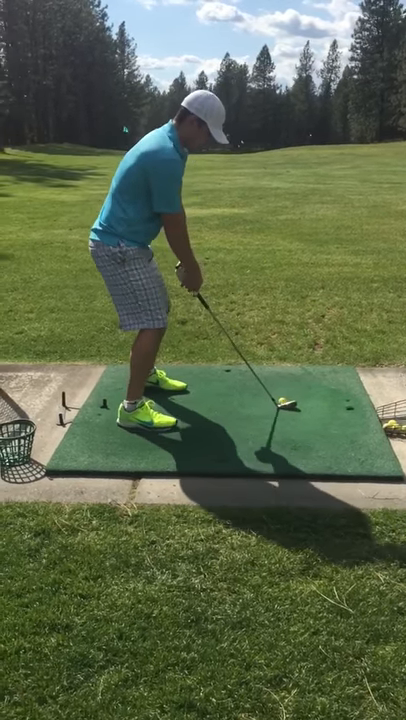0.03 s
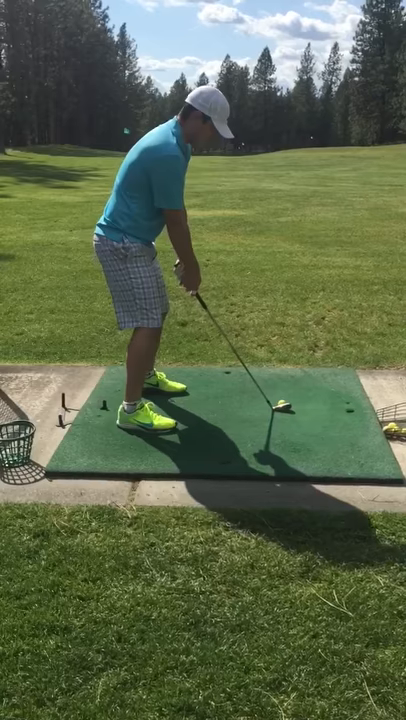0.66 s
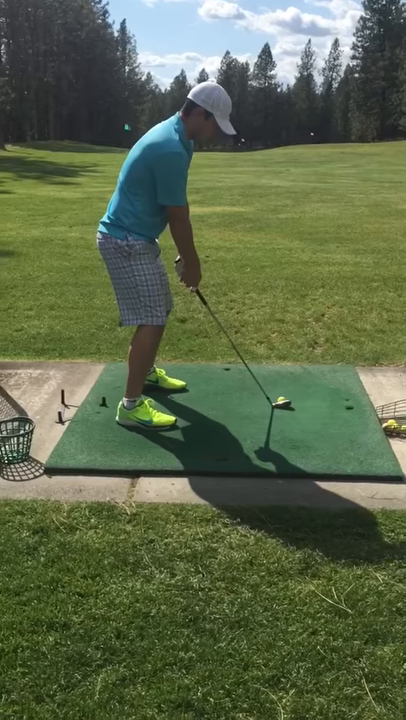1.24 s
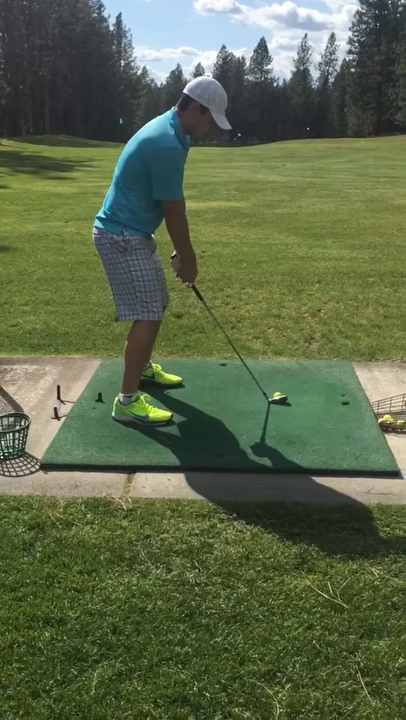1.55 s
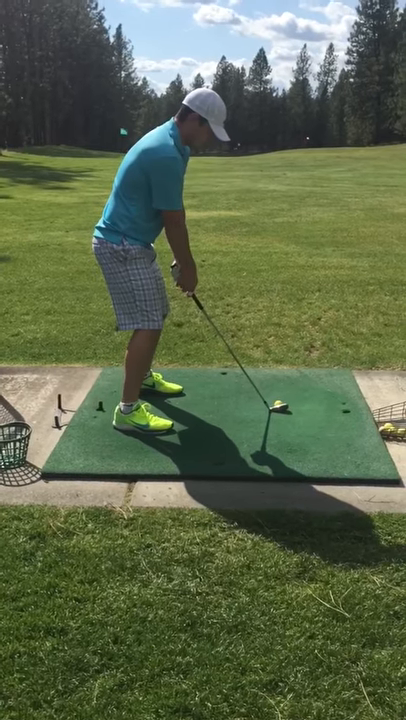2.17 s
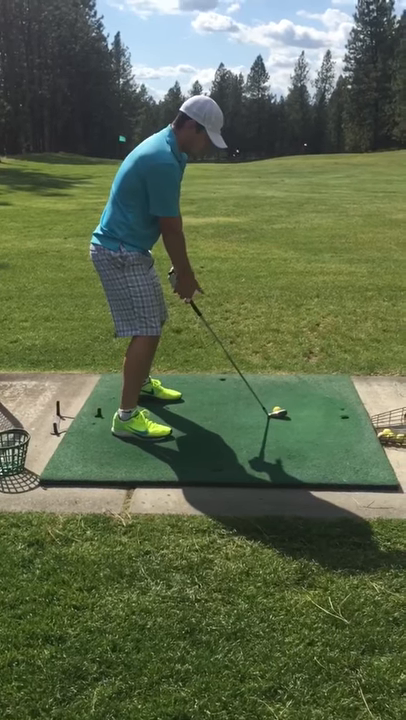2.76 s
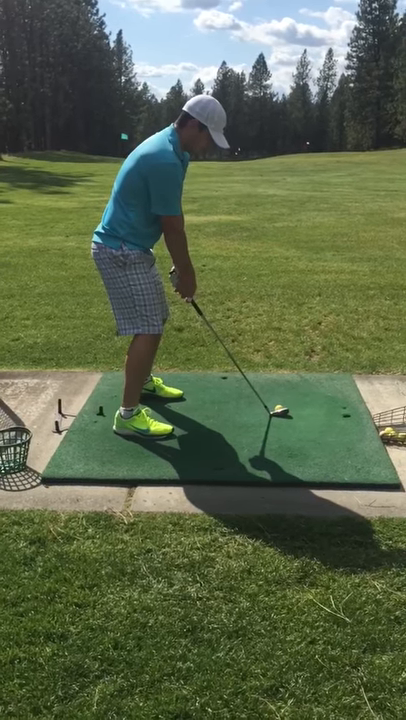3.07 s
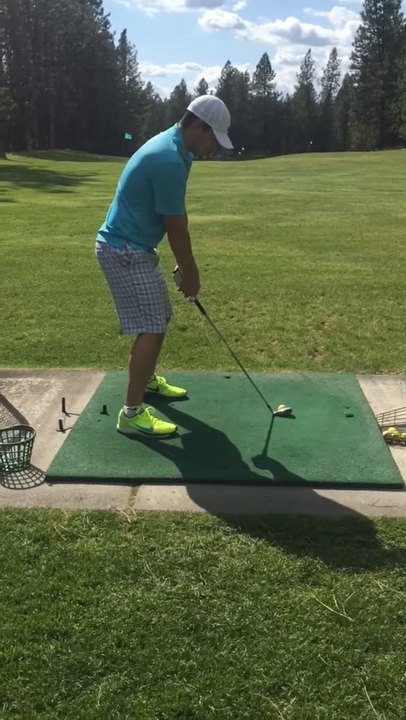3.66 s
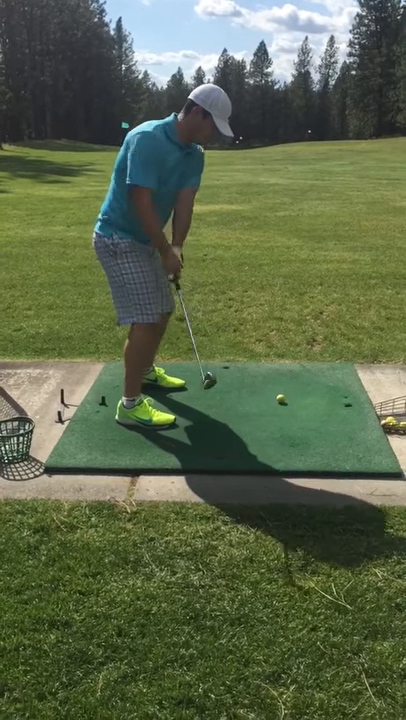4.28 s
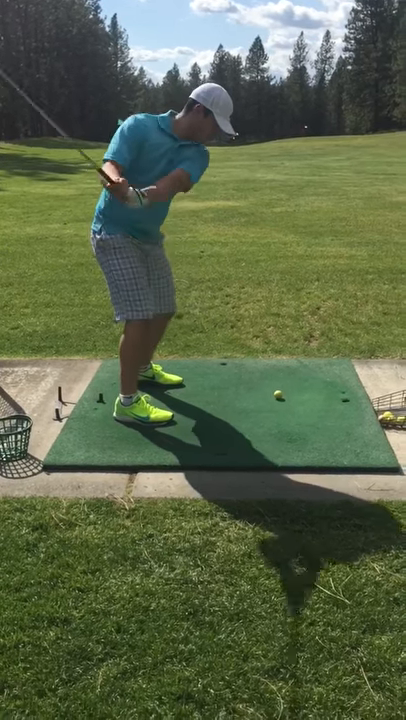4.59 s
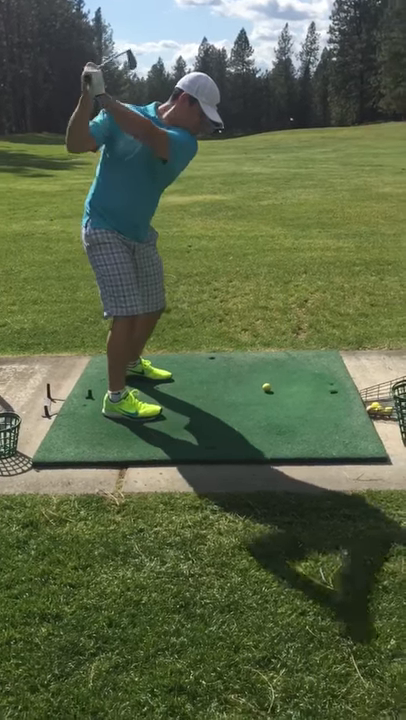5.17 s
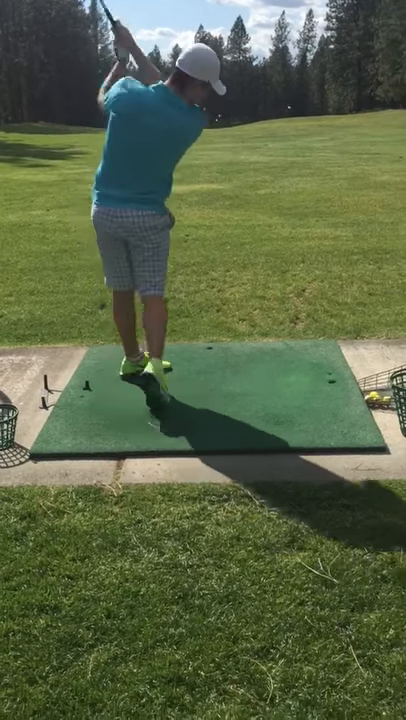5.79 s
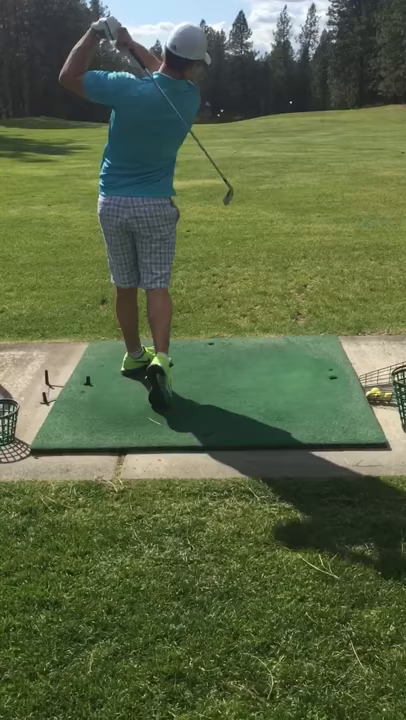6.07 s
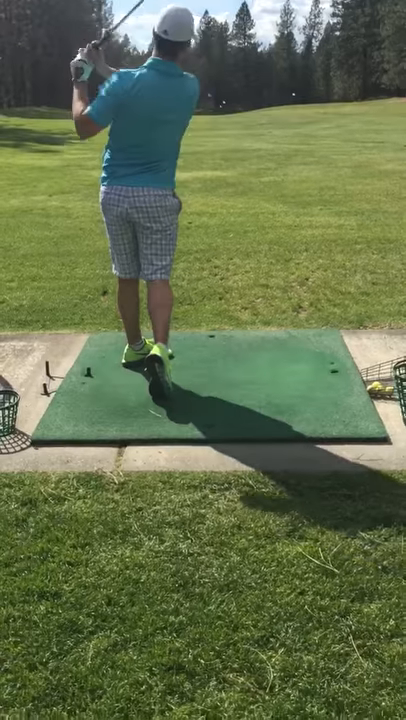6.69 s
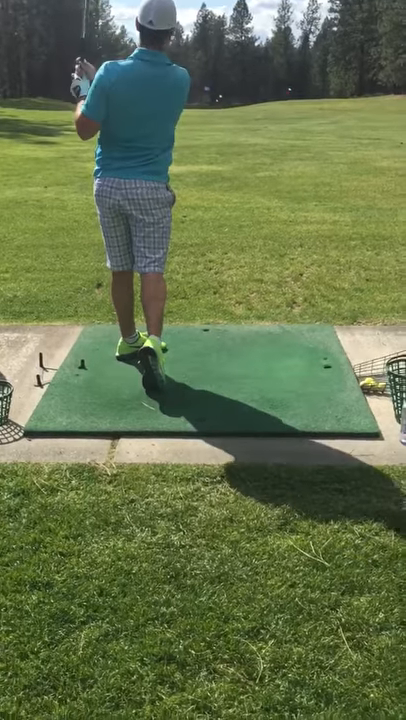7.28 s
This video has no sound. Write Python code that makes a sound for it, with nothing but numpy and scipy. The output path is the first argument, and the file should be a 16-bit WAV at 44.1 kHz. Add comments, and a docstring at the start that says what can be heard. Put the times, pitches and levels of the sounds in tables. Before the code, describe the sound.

A single golf shot cracks out close by, late in a quiet stretch of far traffic hum and tiny, faint bird chirps. The hit is hard and bright, with a quick slight echo and the soft hiss of the ball flying off. Right afterwards wind rumbles and thumps on the microphone, strongest at first, then returning in a weaker gust across the open range.

```python
"""Iron shot at a driving range

A golfer hits one ball off a mat, a few metres from a phone. Club head and ball ring with a hard crack
that bounces off the pad and echoes once; the spinning ball hisses away and a shoe scuffs as it pivots.
Gusts buffet the microphone, hardest just after the shot. Behind it all: the rumble and tyre roar of
far traffic, droning engines and small birds chipping in the pines."""
import sys
import numpy as np
from scipy import signal
from scipy.fft import rfft, irfft
from scipy.io import wavfile
from scipy.ndimage import uniform_filter1d

SR = 44100
rng = np.random.default_rng(int(sys.argv[2]) if len(sys.argv) > 2 else 0)


def wrap_up_sound(samples):
    """Save the sound to the file named by the first command line argument, as 16-bit audio."""
    columns = np.atleast_2d(samples).T
    # keep every value between -1 and 1, then stretch to whole-number steps
    tamed = np.clip(columns, -1, 1)
    steps = np.round(tamed * 32767).astype(np.int16)
    wavfile.write(sys.argv[1], SR, steps)


N = 328104
TIME = np.arange(N) / SR
STRIKE_S = 5.70105

# far engine tones: (pitch [Hz], relative level [dB], holds until [s])
ENGINE_TONES = [(62.4, -51, 0.89), (78.5, -45.5, 3.0), (123.3, -49.5, 1.9), (155.9, -50, 1.97),
                (224, -61.5, 5.1), (282, -62, 4.6)]
# rising bird chips: (time [s], start pitch [Hz], end pitch [Hz], level [dB])
BIRD_CHIPS = [(1.325, 6100, 6500, -72), (1.345, 6450, 7350, -73), (1.372, 6100, 6450, -71),
              (1.378, 6950, 7350, -76), (3.097, 6050, 6450, -75), (3.322, 6050, 6400, -75),
              (4.7, 6150, 6450, -77), (4.728, 5750, 6440, -72), (4.745, 7000, 7250, -74),
              (6.35, 7050, 7500, -72), (6.36, 6150, 6900, -72), (6.383, 6950, 7340, -66),
              (6.4, 6200, 6650, -71)]
# gust envelopes: (rise ends [s], sag starts [s], fall starts [s], nominal level [dB])
GUST_ENVELOPES = [(4.808, 4.98, 4.6, -49), (5.651, 5.665, 6.3, -39.5), (5.905, 5.95, 5.965, -31.5),
                  (6.08, 6.26, 6.32, -20.5), (6.388, 6.514, 6.55, -27.5), (6.65, 6.751, 6, -44.5),
                  (6.905, 7.262, 7.23, -38.5)]
# large eddies that thump: (time [s], thump level [dB], pitch [Hz], puff level [dB])
EDDY_THUMPS = [(4.826, -33.5, 68, -70), (4.991, -28.5, 71.5, -70.5), (5.502, -28, 68.6, -70),
               (5.653, -22, 100, -50), (5.82, -22, 88, -52), (5.945, -15, 104.3, -46),
               (6.022, -25.5, 300, -34), (6.048, -16, 84.9, -29), (6.07, -6.5, 220.4, -17.5),
               (6.085, -13, 220, -26.5), (6.116, -13.5, 139.4, -30.5), (6.129, -14, 160, -37.5),
               (6.138, -11.5, 161, -23), (6.156, -10, 240, -16.5), (6.171, -9.5, 174.4, -27),
               (6.191, -11.5, 135, -47), (6.211, -9, 149, -29.5), (6.232, -16, 170, -27),
               (6.255, -9, 167, -25), (6.268, -10, 197.5, -23), (6.282, -10.5, 130, -39),
               (6.313, -15, 180, -24), (6.348, -10.5, 159.6, -27.5), (6.376, -12, 180, -27),
               (6.41, -21, 170, -38), (6.427, -18.5, 190, -39), (6.47, -18.5, 220, -38.5),
               (6.507, -11.5, 140.5, -43.5), (6.521, -17, 109, -36.5), (6.549, -22.5, 94, -47),
               (6.566, -26, 170, -48.5), (6.903, -25, 177, -60), (6.915, -19.5, 101, -57),
               (7.041, -19.5, 152, -52), (7.059, -16.5, 147.2, -51), (7.155, -15.5, 94.8, -45),
               (7.194, -18.5, 138, -58), (7.21, -20, 85.2, -53), (7.268, -24.5, 220, -49),
               (7.278, -18.5, 69.8, -53), (7.376, -26, 109.8, -56)]
# rubber sole slipping on the mat: (time [s], level [dB])
SHOE_SLIPS = [(6.015, -49), (6.028, -50.5)]
# resonances that colour the echo: (centre [Hz], width [Hz], relative level [dB])
ECHO_BANDS = [(1580, 240, -13.5), (3034, 400, -18), (3850, 310, -16.5)]
# ring of club head and ball: (pitch [Hz], level [dB], 60 dB decay time [s])
IMPACT_MODES = [(170, -9.1, .0093), (587, -21, .024), (859, -16.5, .03), (918, -12.8, .033),
                (1104, -6.6, .018), (1337, -6.2, .0088), (1621, -7.3, .0118), (2035, -2.6, .0139),
                (2349, -11.5, .027), (2483, -18.5, .02), (3569, -9.9, .0182), (3966, -27.2, .036),
                (4472, -6.3, .0037), (4918, -24.6, .014), (5774, -34.9, .03), (6065, -20.1, .0077),
                (6532, -12.4, .0055), (8352, -18.5, .0039)]

# noise colours of far traffic, shoe scuff and flying ball: (frequency [Hz], relative level [dB])
TRAFFIC_COLOUR = [(15, -53.5), (25, -30), (40, -10.5), (59, 3), (100, -3), (160, -4.5), (277, -13),
                  (463, -28), (750, -21.5), (1150, -20.5), (1500, -24.5), (2000, -31), (2900, -46),
                  (4300, -51), (4900, -55.5), (5600, -53), (7600, -58), (9300, -57), (10400, -62),
                  (11400, -59.5), (14000, -61), (14700, -65), (16000, -61.5)]
SHOE_COLOUR = [(1500, -18), (3400, 6), (4600, -3.5), (6500, 4.5), (9500, -3), (12000, 1.5), (16000, -6.5)]
BALL_COLOUR = [(500, -28.5), (1400, -2), (2400, 1.5), (4000, -4.5), (6000, -12), (9000, -18), (12000, -22),
               (16000, -21.5)]
# noise colours of the wind's rumble, tearing and puffs: (frequency [Hz], relative level [dB])
WIND_COLOUR = [(20, -13), (45, 2.5), (90, 2), (150, -2), (230, -7.5), (330, -21.5), (600, -41.5),
               (2000, -90.5)]
TEAR_COLOUR = [(120, -13), (260, 0), (400, 0), (750, -17), (1200, -33), (2500, -58), (10000, -100)]
PUFF_COLOUR = [(120, -13), (260, 0), (450, 1), (750, -8), (1200, -23), (2500, -52), (10000, -100)]
# noise colours of swing, echo smear, mat brush and scattered tail: (frequency [Hz], relative level [dB])
SWING_COLOUR = [(300, -12), (900, 2), (2200, -1.5), (3200, -9.5), (5000, -16), (8000, -22), (16000, -28)]
SMEAR_COLOUR = [(600, -27), (1500, 2.5), (2800, .5), (4200, -14), (6000, -23), (16000, -41)]
MAT_COLOUR = [(150, -2.5), (900, 0), (2600, -4), (3600, -9.5), (5500, -14), (9000, -17), (16000, -23)]
TAIL_COLOUR = [(200, 2), (1000, -.5), (2000, -3.5), (3000, -13.5), (3900, -7.5), (4900, -21.5),
               (7000, -19), (16000, -27)]


def undb(db):
    """Decibels to gain."""
    return 10 ** (np.asarray(db) / 20)


def unit(x):
    """Scale to rms 1."""
    return x / np.std(x)


def noise(colour):
    """Noise of rms 1, shaped by a colour table."""
    hz, db = np.transpose(colour)
    bins = np.fft.rfftfreq(N, 1 / SR)
    eq = undb(np.interp(np.log(bins + 1), np.log(hz), db))
    return unit(irfft(rfft(rng.standard_normal(N)) * eq, N))


def filt(x, hz, kind, order=2):
    """Butterworth filter."""
    return signal.sosfilt(signal.butter(order, hz, kind, fs=SR, output="sos"), x)


def drift(rate_hz):
    """Smooth random modulation with spread 1."""
    knots = rng.standard_normal(int(N / SR * rate_hz) + 2)
    ramps = np.interp(TIME * rate_hz, np.arange(len(knots)), knots)
    return unit(uniform_filter1d(ramps, int(SR / rate_hz / 2)))


def delay(x, lag_s):
    """The same sound, arriving later."""
    return np.interp(TIME - lag_s, TIME, x, left=0)


def since(start):
    """Seconds gone by after a moment, zero before it."""
    return np.maximum(TIME - start, 0)


def until(end):
    """Seconds left before a moment, zero after it."""
    return np.maximum(end - TIME, 0)


def decay(start, t60):
    """Instant attack, then a fall of 60 dB every t60 seconds."""
    return (TIME >= start) * np.exp(-np.log(1000) * since(start) / t60)


def traffic(rumble_db=-44.5, recede_db_per_s=.62, roar_db=-49.5, shimmer_db=2):
    """Far traffic: a slowly receding rumble under tyre roar that shimmers on the breeze."""
    bed = noise(TRAFFIC_COLOUR)
    rumble = unit(filt(bed, 435, "low", order=4)) * undb(rumble_db - recede_db_per_s * TIME + drift(12))
    roar = filt(bed, 426, "high", order=4)
    # moving air lets each band swell and sink on its own
    for hz in np.geomspace(800, 2800, 16):
        band = signal.lfilter(*signal.iirpeak(hz, Q=16, fs=SR), roar)
        roar = roar + band * (undb(shimmer_db * drift(18)) - 1)
    return rumble + unit(roar) * undb(roar_db)


def engines(trim_db=-1.5, drop_db=11.5, release_s=.58, waver=.008):
    """Far engines drone in wavering tones; each holds, then sinks to a lower level."""
    out = 0
    for hz, db, holds in ENGINE_TONES:
        phase = 2 * np.pi * np.cumsum(hz * (1 + waver * drift(10))) / SR
        # the tone arrives by several shifting paths, which swell and cancel
        tone = unit((.8 + drift(9) / 2) * np.sin(phase) + drift(9) / 2 * np.cos(phase))
        release = np.minimum(since(holds) / release_s, 1)
        out = out + tone * undb(db + trim_db - drop_db * release)
    return out


def birds(chip_s=.037, rasp=.016, reverb_db=-4):
    """Thin, raspy rising chips in small clusters, blurred by the trees."""
    chips = np.zeros(N)
    waver = 1 + rasp * drift(1200)
    for start, start_hz, end_hz, db in BIRD_CHIPS:
        near = (TIME > start) & (TIME < start + chip_s)
        progress = (TIME[near] - start) / chip_s
        hz = (start_hz + (end_hz - start_hz) * progress) * waver[near]
        chips[near] += undb(db) * np.sin(np.pi * progress) * np.sin(2 * np.pi * np.cumsum(hz) / SR)
    trees = rng.standard_normal(N) * decay(0, t60=.13)
    reverb = signal.fftconvolve(chips, trees / np.linalg.norm(trees))[:N]
    return chips + undb(reverb_db) * reverb


def gust_level(breeze_db=-58, sag_db_per_s=27, edge_db_per_s=269.5):
    """Wind envelope in dB: steep-edged, sagging gusts over a light breeze."""
    strength = undb(breeze_db)
    for rise_end, sag_start, fall_start, db in GUST_ENVELOPES:
        edges_db = edge_db_per_s * (until(rise_end) + since(fall_start))
        strength = strength + undb(db - sag_db_per_s * since(sag_start) - edges_db)
    return 20 * np.log10(strength)


def eddies(width_cycles=.47, puff_s=.0038, slap_db=2, slap_hz=420, slap_s=.001):
    """Each large eddy pushes and pulls the diaphragm, slaps as it tears off and breaks up in a puff."""
    out = np.zeros(N)
    breakup = noise(PUFF_COLOUR)
    for centre, thump_db, hz, puff_db in EDDY_THUMPS:
        near = np.abs(TIME - centre) < 3 / hz
        age = TIME[near] - centre
        thump = -np.sin(2 * np.pi * hz * age) * np.exp(-(hz * age / width_cycles) ** 2 / 2)
        slap = undb(slap_db) * np.sin(2 * np.pi * slap_hz * age) * np.exp(-(age / slap_s) ** 2)
        puff = breakup[near] * np.exp(-(age / puff_s) ** 2)
        out[near] += undb(thump_db) * thump + undb(puff_db) * (puff - slap)
    return out


def wind(flutter_db=2.5, shedding_hz=144.3, buffet_db=-1, tear_db=-13, port_hz=50):
    """Turbulence at the microphone port: rumble, buffeting, tearing and thumps."""
    gust_db = gust_level()
    peak_db = gust_db.max()
    lull_db = gust_db - peak_db
    rumble = noise(WIND_COLOUR) * undb(gust_db + flutter_db * drift(40))
    # the phone's edge sheds an uneven train of small eddies, quicker the harder it blows
    rate_hz = shedding_hz * undb(.15 * lull_db) * np.exp(.24 * drift(220))
    buffet = np.sin(2 * np.pi * np.cumsum(rate_hz) / SR)
    buffet *= undb(peak_db + buffet_db + 1.2 * lull_db + 1.3 * drift(120))
    tearing = noise(TEAR_COLOUR) * undb(peak_db + tear_db + 1.17 * lull_db + 3 * drift(90))
    return filt(rumble + buffet + tearing + eddies(), port_hz, "high")


def shoe(slip_s=.0096, grit_db=3.5):
    """The back foot pivots on its toe in two short gritty slips."""
    slips = sum(undb(db) / np.cosh(np.minimum(np.abs(TIME - centre) / slip_s, 20)) ** 2
                for centre, db in SHOE_SLIPS)
    return noise(SHOE_COLOUR) * slips * undb(grit_db * drift(640))


def downswing(peak_db=-52, swell_db_per_s=57.5):
    """Air rushes round the club, swelling until impact."""
    return noise(SWING_COLOUR) * undb(peak_db - swell_db_per_s * until(STRIKE_S)) * (TIME < STRIKE_S)


def ball_flight(crest_db=-45.5, crest_s=5.92, swell_db_per_s=40, recede_s=.068, falloff=2.3):
    """Air hisses round the spinning ball, crests, then dies away with distance, treble first."""
    hiss = noise(BALL_COLOUR) * undb(crest_db - swell_db_per_s * until(crest_s) + .2 * drift(64))
    distance = np.hypot(1, since(crest_s) / recede_s)
    body = filt(hiss, 3500, "low", order=1)
    treble = (hiss - body) / distance ** 2
    return (body + treble) / distance ** falloff * (TIME >= STRIKE_S)


def echo(crack, lag_s=.063, return_db=-6, smear_db=-36, smear_s=.0045):
    """Something about ten metres off returns the crack, coloured, dulled and smeared."""
    coloured = sum(undb(db) * signal.lfilter(*signal.iirpeak(hz, hz / width, fs=SR), crack)
                   for hz, width, db in ECHO_BANDS)
    slapback = delay(filt(coloured, 5110, "low"), lag_s)
    smear = noise(SMEAR_COLOUR) * np.exp(-((TIME - STRIKE_S - lag_s) / smear_s) ** 2)
    return undb(return_db) * slapback + undb(smear_db) * smear


def strike(contact_s=.00025, pad_lag_s=.00218, brush_s=.0089, brush_db=-23, crack_db=-22, tail_db=-23):
    """The club's sole brushes the mat, the face meets the ball, and both ring briefly."""
    age = TIME - STRIKE_S
    brush = noise(MAT_COLOUR) * np.clip(6 * (age + brush_s) / brush_s, 0, 1) * (age < 0)
    # a bright tick marks the first touch
    click = undb(2) * signal.unit_impulse(N, int(STRIKE_S * SR))
    fizz = undb(-11) * rng.standard_normal(N) * decay(STRIKE_S, t60=.0045)
    tick = filt(click + fizz, 6000, "high")
    # the low knock and the high ring start in opposite directions
    ring = sum(np.sign(1500 - hz) * undb(db) * np.sin(2 * np.pi * hz * age) * decay(STRIKE_S, t60)
               for hz, db, t60 in IMPACT_MODES)
    # as the ball squashes, the ring builds and a dense crack fills in between the modes
    ring *= np.clip(age / contact_s, 0, 1)
    crack = unit(filt(rng.standard_normal(N), [750, 3000], "band")) * decay(STRIKE_S, t60=.04)
    # the bounce off the pad combs the spectrum and loses the top
    bounce = -.39 * delay(filt(ring, 8800, "low", order=1), pad_lag_s)
    # grass and nearby things scatter a short tail
    tail = noise(TAIL_COLOUR) * decay(STRIKE_S, t60=.071)
    return undb(brush_db) * brush + tick + ring + undb(crack_db) * crack + bounce + undb(tail_db) * tail


def scene():
    """The mono mix at the microphone: distant bed, wind and the shot."""
    background = traffic() + engines() + birds()
    crack = strike()
    shot = shoe() + downswing() + ball_flight() + echo(crack) + crack
    return (background + wind() + shot)[None]


def record(dry, knee_db=-22, settle_s=.44, squeeze=.24, top_hz=15800):
    """Slow gain control ducks under the gust; the crack just clips the phone, which also cuts the top."""
    pole = np.exp(-1 / (settle_s * SR))
    power = signal.lfilter([1 - pole], [1, -pole], dry ** 2)
    gain = (1 + power / undb(knee_db) ** 2) ** -squeeze
    clipped = np.clip(dry * gain, -1, 1)
    return signal.sosfilt(signal.ellip(10, .2, 80, top_hz, fs=SR, output="sos"), clipped)


dry = scene()
out = record(dry)
wrap_up_sound(out)
```